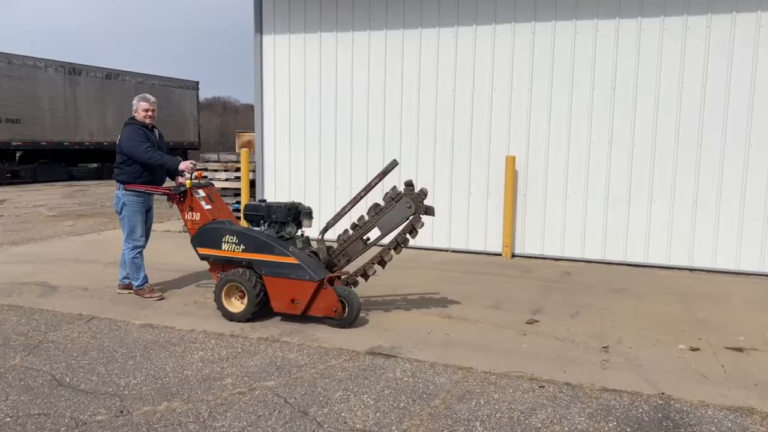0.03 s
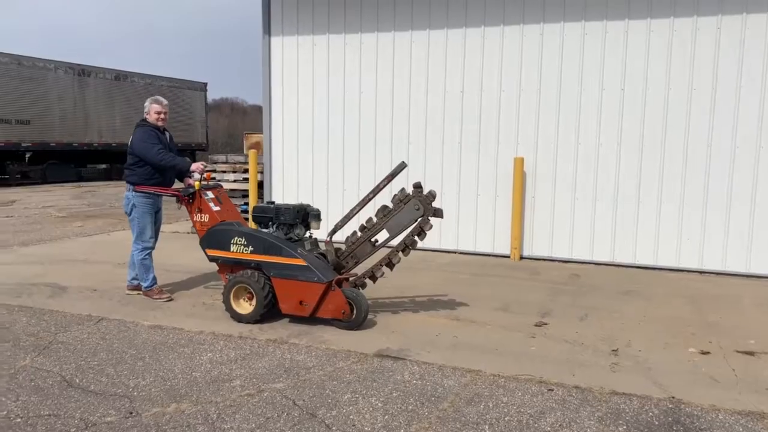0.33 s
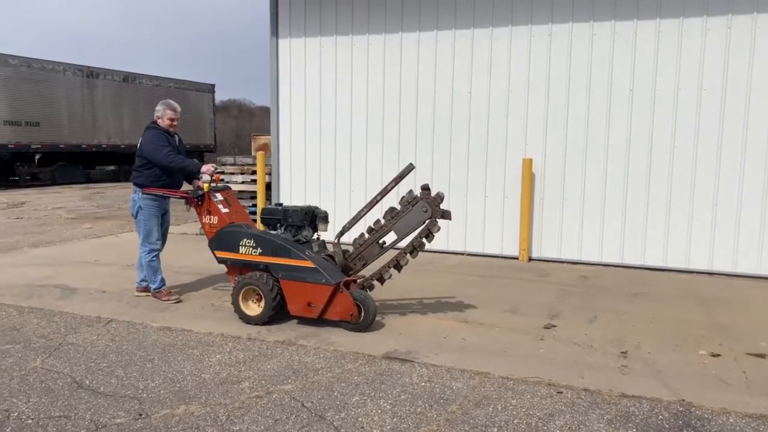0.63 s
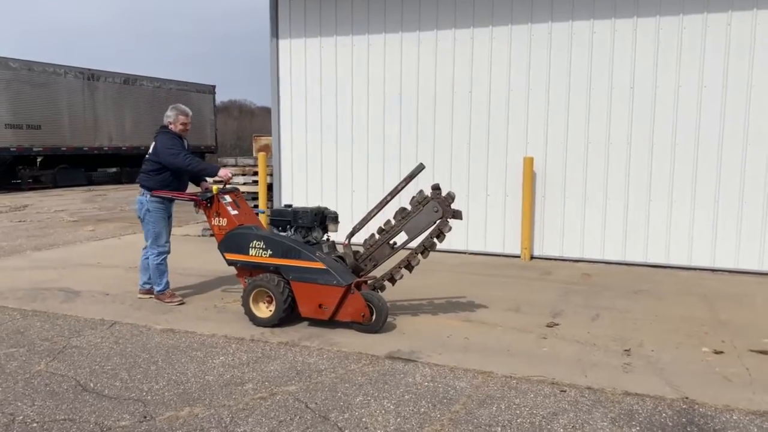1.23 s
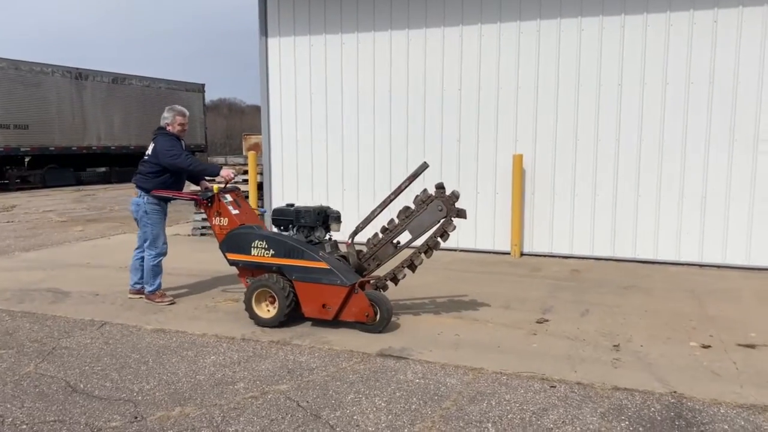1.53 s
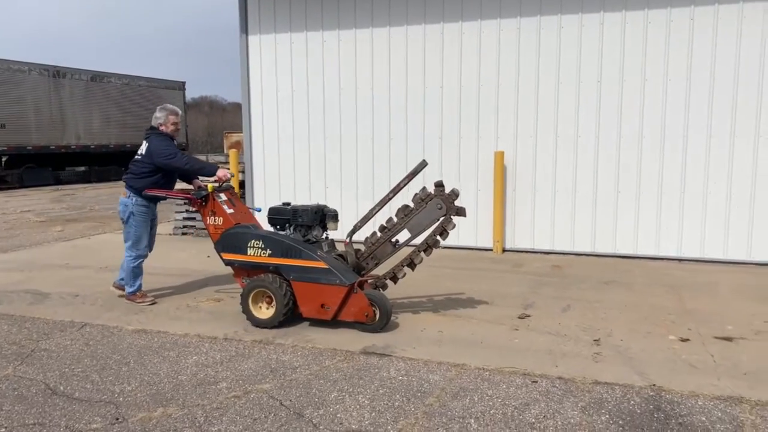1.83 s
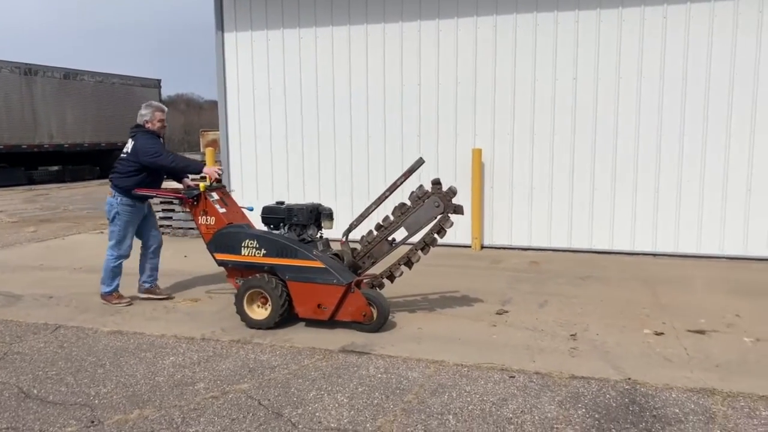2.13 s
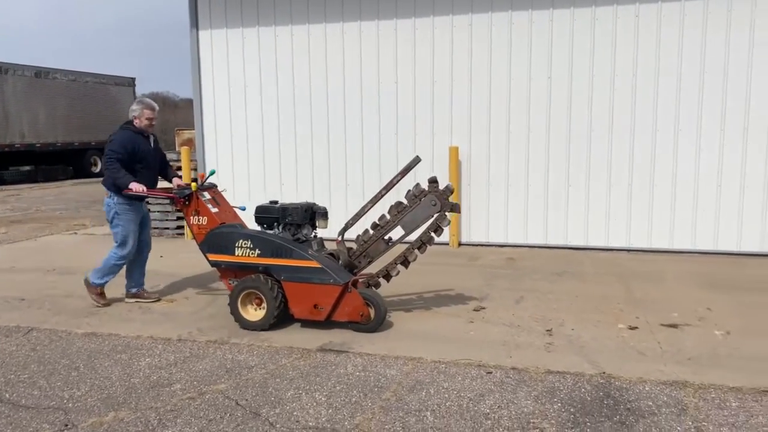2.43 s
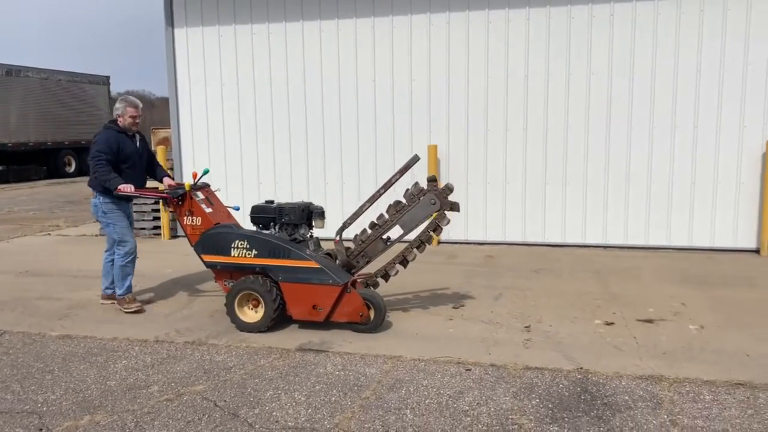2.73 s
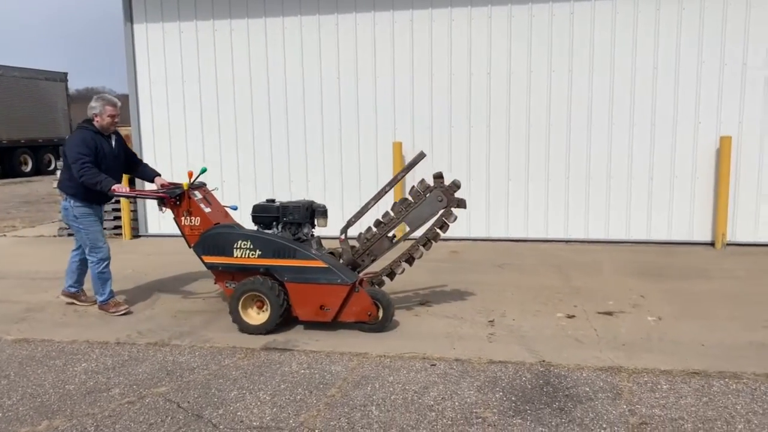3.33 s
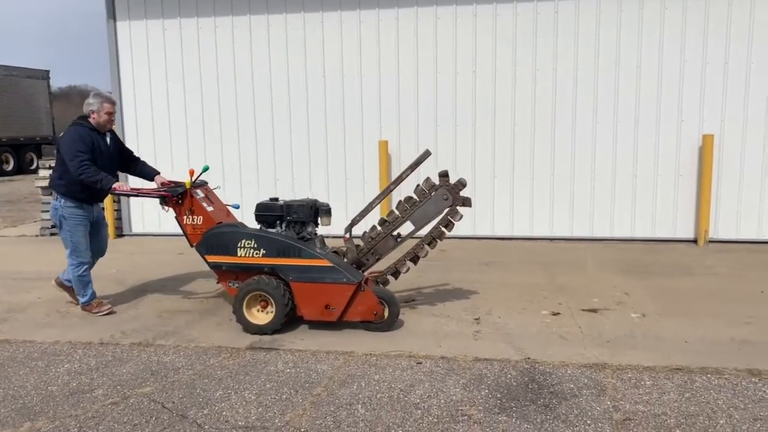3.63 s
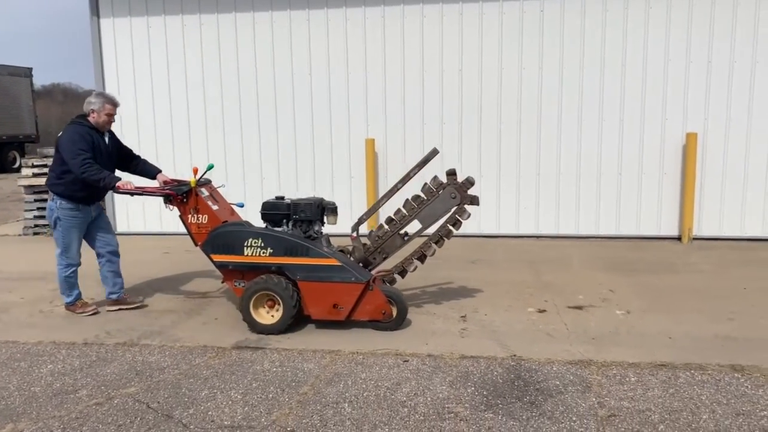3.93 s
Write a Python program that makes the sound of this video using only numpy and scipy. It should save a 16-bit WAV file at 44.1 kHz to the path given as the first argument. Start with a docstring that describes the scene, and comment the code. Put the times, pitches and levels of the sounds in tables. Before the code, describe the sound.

The small engine of a trenching machine drones outdoors, pulsing fast while its metal covers rattle. Fingers bump the microphone early on and again midway, with faint wind, then sharper clacks briefly join the steady running.

```python
"""A walk-behind trencher rolls slowly across a concrete yard, in front of a steel wall. From the start,
each cycle of its single-cylinder four-stroke brings a low throb, a burst of hiss and a valve tick, and
rings the muffler and covers over a bed of clatter. Near 0.4 s come a puff of breeze and four close
knocks that dive in pitch, like fingers on the microphone case. The wide, phasey stereo image shifts,
two more knocks land just after 2 s, harder firings clack until 3.4 s, and a faint knock comes last."""
import sys
import numpy as np
from scipy import signal
from scipy.fft import rfft, irfft
from scipy.io import wavfile

SR = 44100
rng = np.random.default_rng(int(sys.argv[2]) if len(sys.argv) > 2 else 0)


def log_audio(samples):
    """Write samples as a 16-bit WAV file to the path given in sys.argv[1]."""
    # one column per channel
    frames = np.atleast_2d(samples).T
    # limit to full scale, then quantise
    limited = np.clip(frames, -1, 1)
    pcm = np.round(limited * 32767).astype(np.int16)
    wavfile.write(sys.argv[1], SR, pcm)


N = 176400
TIME = np.arange(N) / SR
OPEN_S = .036   # silence until here


def from_db(db):
    """Decibels to gain."""
    return 10 ** (np.asarray(db) / 20)

def in_time(rows):
    """An automation curve, read at every sample."""
    return np.interp(TIME, *np.transpose(rows))

def at_hz(points, hz):
    """A curve read on a log-frequency axis."""
    f, value = np.transpose(points)
    return np.interp(np.log(hz + 1), np.log(f + 1), value)

def colour(x, spectrum):
    """Give white noise of spread 1 a spectrum in dB per Hz."""
    hz = np.arange(N // 2 + 1) * SR / N
    return irfft(rfft(x) * from_db(at_hz(spectrum, hz)), N) * np.sqrt(SR / 2)

def resonate(x, hz, width):
    """One resonance, its skirts steepened by a second, wider one; rms 1."""
    for w in (width, 6 * width):
        r = np.exp(-np.pi * w / SR)
        x = signal.lfilter([1, 0, -1], [1, -2 * r * np.cos(2 * np.pi * hz / SR), r * r], x)
    return x / x.std()

def shaking(cycles, repeat, size=1760):
    """White vibration; the share `repeat` of its power loops with the engine cycle."""
    loop = irfft(np.exp(2j * np.pi * rng.random(size // 2 + 1)), size) * np.sqrt(size)
    looped = loop[(cycles % 1 * size).astype(int)]
    return np.sqrt(repeat) * looped + np.sqrt(1 - repeat) * rng.standard_normal(N)


# The engine's pace. Each row: time in seconds, crank speed in rpm.
SPEED = [(0.0, 3044), (0.6, 3065), (1.0, 3031), (1.4, 3037), (1.8, 2974), (2.2, 2984), (2.7, 3013),
         (3.3, 2999), (4.0, 2974)]

def engine_cycles(wobble_cycles=.004, wobble_hz=14):
    """Running count of cycles: one firing per two crank turns, slightly unsteady."""
    r = np.exp(-2 * np.pi * wobble_hz / SR)
    drift = signal.lfilter([1], [1, -2 * r, r * r], rng.standard_normal(N))
    cycles = .05 + np.cumsum(in_time(SPEED)) / (120 * SR)
    return cycles + wobble_cycles * drift / drift.std()


# Harder firings that clack. Each row: time in seconds, accent in dB.
CLACKS = [(2.333, 5), (2.653, 4.5), (2.773, 5), (2.812, 5.5), (2.932, 4), (3.012, 4), (3.093, 4),
          (3.133, 4), (3.293, 3), (3.373, 5)]
FIRING_AT = .792   # share of the cycle

def force(cycles, scatter_db, count=128):
    """Strength of each cycle: a little random, accented at the clacks."""
    db = scatter_db * rng.standard_normal(count)
    cycle = np.floor(cycles - FIRING_AT + 1.25).astype(int) % count   # steps a quarter cycle early
    for s, accent_db in CLACKS:
        db[cycle[int(s * SR)]] = accent_db
    return from_db(db)[cycle]

def strikes(cycles, at, count=104, jitter_s=.0001):
    """One click per cycle, slightly uneven in time and strength."""
    s = np.interp(np.arange(count) + at, cycles, TIME) + jitter_s * rng.standard_normal(count)
    s = s[(s > OPEN_S) & (s < TIME[-1] - .01)]
    clicks = np.zeros(N)
    clicks[(s * SR).astype(int)] = 1
    return clicks * force(cycles, scatter_db=2.7) + 1e-18


# The covers' notes. Each row: pitch in Hz, width in Hz, level in dB when facing the listener, strike
# point as a share of the cycle, struck share of the power, facing time in seconds, fade either side
# of that time in dB per second (negative grows).
COVERS = [(642, 43, -37, 0.55, 0.16, 3.4, 6), (630, 35, -30, 0.144, 0.39, 2, 34),
          (820, 75, -37.5, 0.85, 0.11, 0.11, 33), (775, 48.5, -37, 0.1008, 0.42, 3.8, -1),
          (857.7, 30, -33.5, 0.1004, 0.26, 4.1, 2), (920, 40, -46, 0.3, .2, 5.2, 9),
          (1132, 91, -41.5, .56, 0.38, 2.77, 1.5), (1229, 35, -41.5, 0.13, 0.63, 2.1, 9),
          (1330, 116, -40.5, .3, 0.13, 2.96, 7), (1567, 128, -39, .77, 0.5, 1.2, 4.5),
          (2380, 124, -38, 0.89, 0.1, 2.67, 7.5), (3150, 400, -38.5, 1, .15, 1.15, 11.5),
          (4467, 134, -40, .78, 0.85, 1.2, 3.5), (4546, 140, -37.5, .8, 0.87, 3.39, 30)]

def covers(cycles):
    """Each cover rings, struck at its own point of the cycle and shaken in between."""
    out = 0
    for hz, width, db, at, share, facing_s, fade in COVERS:
        struck = resonate(strikes(cycles, at), hz, width)
        shaken = resonate(shaking(cycles, repeat=.46), hz, width)
        ring = np.sqrt(share) * struck + np.sqrt(1 - share) * shaken
        out += from_db(db - fade * abs(TIME - facing_s)) * ring
    return out


# Faders for the muffler's two notes. Each row: time in seconds, level in dB.
HOLLOW_LEVEL = [(.1, -36), (.6, -61), (.85, -37), (1.1, -33), (1.45, -29.5), (1.8, -37.5), (2.3, -57),
                (4, -42)]
POP_LEVEL = [(.1, -50), (.8, -49), (1.2, -44), (2, -43), (2.4, -39), (2.8, -38), (3.3, -37.5), (4, -44)]

def muffler(cycles):
    """Every firing rings the muffler: mostly a hollow note at first, a higher pop later."""
    hollow = resonate(strikes(cycles, at=.67), hz=815, width=42)
    pop = resonate(strikes(cycles, at=.79), hz=1365, width=95)
    return from_db(in_time(HOLLOW_LEVEL)) * hollow + from_db(in_time(POP_LEVEL)) * pop


# The clatter's tone. Each row: frequency in Hz, level in dB per Hz before the fader.
CLATTER = [(500, -81), (700, -67.5), (900, -77), (1030, -74.5), (1400, -72), (1900, -65.5), (2700, -69),
           (3600, -66), (4200, -73), (5500, -80), (7000, -80), (11000, -78), (13000, -85.5), (16000, -115)]
# Its fader. Each row: time in seconds, gain in dB.
CLATTER_LEVEL = [(.1, -.5), (.8, -0.5), (1.3, -2.5), (1.8, -8), (2.3, 0), (2.8, 0), (3.3, -4), (4, -11.5)]

def clatter(cycles):
    """Gears and tappets make a dense noise that swells a little after each firing."""
    swell_db = 1.24 * np.cos(2 * np.pi * cycles)
    return from_db(in_time(CLATTER_LEVEL) + swell_db) * colour(shaking(cycles, repeat=.072), CLATTER)


# The hiss's tone. Each row: frequency in Hz, level in dB per Hz before envelope and fader.
HISS = [(1200, -74), (2000, -63), (2900, -76.5), (4000, -69), (4800, -69), (5700, -75.5), (7200, -66),
        (9000, -71), (11000, -66.5), (12200, -70), (13500, -73.5), (15500, -71), (16200, -126)]
# Its fader. Each row: time in seconds, gain in dB.
HISS_LEVEL = [(.1, -9), (.8, -3), (1.3, -4.5), (1.8, -1.5), (2.3, -0.5), (2.8, -1.5), (3.3, -1), (3.7, -4),
              (4, -0.5)]

def hiss(cycles, rise=.093, hold=.023, decay=.18):
    """A sharp burst at each firing; envelope times are shares of a cycle."""
    age = (cycles - FIRING_AT) % 1
    envelope = np.minimum(age / rise, 1) * np.exp(-np.maximum(age - rise - hold, 0) / decay)
    burst = envelope * force(cycles, scatter_db=1.7) * colour(rng.standard_normal(N), HISS)
    return from_db(in_time(HISS_LEVEL)) * burst


# The throb's partials. Each row: multiple of the crank rate, level in dB before the fader.
ORDERS = [(1, -51), (1.5, -62), (2, -52.5), (2.5, -74), (3, -52), (3.5, -59.5), (4, -62), (4.5, -58.5)]
# The rumble's tone. Each row: frequency in Hz, level in dB per Hz before the fader.
RUMBLE = [(40, -87), (100, -90), (160, -71), (220, -71), (310, -61.5), (440, -69.5), (600, -63), (900, -86)]
# Their faders. Each row: time in seconds, gain in dB.
THROB_LEVEL = [(.1, 4.5), (.7, 1), (1.3, -1), (1.8, -2), (2.3, 6.5), (2.8, 4), (3.3, 2.5), (4, -1.5)]
RUMBLE_LEVEL = [(.1, -2.5), (.6, -8), (1.0, -14), (1.4, -12.5), (1.9, -1.5), (2.6, -7.5), (3.3, -8.5),
                (4, -7.5)]

def throb(cycles):
    """The low end: tones locked to the crank, plus exhaust rumble."""
    tones = 0
    for order, db in ORDERS:
        tones += from_db(db) * np.sqrt(2) * np.sin(2 * np.pi * (2 * order * cycles + rng.random()))
    rumble = colour(shaking(cycles, repeat=.73), RUMBLE)
    return from_db(in_time(THROB_LEVEL)) * tones + from_db(in_time(RUMBLE_LEVEL)) * rumble


# The tick's tone. Each row: frequency in Hz, peak level in dB per Hz.
TICK = [(3000, -75.5), (7000, -79), (11000, -71), (16000, -89)]

def valve_tick(cycles, at=.442, width=.031):
    """A valve ticks between firings: a small, rounded pulse of bright noise."""
    offset = (cycles - at + .5) % 1 - .5
    return np.exp(-.5 * (offset / width) ** 2) * colour(rng.standard_normal(N), TICK)


# Metallic glints. Each row: start in seconds, level in dB before the high-pass.
PINGS = [(2.811, -23), (3.012, -18), (3.373, -22)]

def pings(decay_s=.0022, low_hz=9000):
    """Loose metal ticks brightly on three of the hard firings."""
    envelope = sum(from_db(db) * (TIME > s) * np.exp(-abs(TIME - s) / decay_s) for s, db in PINGS)
    highpass = signal.butter(2, low_hz, "high", fs=SR, output="sos")
    return signal.sosfilt(highpass, envelope * rng.standard_normal(N) + 1e-18)


# Close knocks. Each row: start in seconds, level in dB at ref_hz before the band limits, top and bottom
# of the band in Hz, fade in dB per falling octave, left delay in seconds, sweep in Hz times seconds.
KNOCKS = [(.3797, -15, 1300, 400, 4, 0.00055, 1.64), (0.4164, -11, 1680, 402, 5.5, 0.00021, 2),
          (.4328, -11.5, 875, 390, 10.5, 0.00017, 2.04), (.4355, -13, 785, 348, 9.5, 0.00011, 1.76),
          (2.178, -5.5, 950, 63.5, 6, 0.00089, 1.27), (2.3930, -13.5, 740, 69.5, 3, 0.00076, 1.73),
          (3.766, -34, 160, 74.5, 3.5, 0.00076, 1.4)]

def knocks(ref_hz=748, left_db=-6.5):
    """Each knock is a fast downward sweep, earlier and louder on the right."""
    out = 0
    for s, db, top_hz, low_hz, fade_db, lag_s, sweep in KNOCKS:
        age = np.maximum(TIME - s - np.array([[lag_s], [0]]), 1 / SR)
        hz = sweep / age
        band = 1 / np.sqrt((1 + (hz / top_hz) ** 10) * (1 + (low_hz / hz) ** 10))
        level = from_db(db + fade_db * np.log2(hz / ref_hz))
        out += band * level * np.sin(2 * np.pi * sweep * np.log(hz / ref_hz))
    return out * from_db([[left_db], [0]])


# The rub under a 0 dB knock. Each row: frequency in Hz, level in dB per Hz.
GRIT = [(150, -88), (400, -51), (700, -48), (1400, -44), (2800, -76), (8000, -100)]

def grit(delay_s=.00206, decay_s=.012):
    """Each knock rubs a little, which roughens it."""
    envelope = 0
    for s, db, *_ in KNOCKS:
        age = TIME - s - delay_s
        envelope += from_db(db) * (age > 0) * np.exp(-abs(age) / decay_s)
    return envelope * np.array([colour(row, GRIT) for row in rng.standard_normal((2, N))])


# The body of the knocked case. Each row: pitch in Hz, width in Hz, gain in dB.
CASE = [(87, 62, 4.5), (488, 125, -5.5), (610, 84, 3)]

def case(knock):
    """A knock plus the short ring it leaves in the case."""
    out = knock
    for hz, width, db in CASE:
        r = np.exp(-np.pi * width / SR)
        ring = signal.lfilter([1, 0, -1], [1, -2 * r * np.cos(2 * np.pi * hz / SR), r * r], knock + 1e-18)
        out = out + from_db(db) * (1 - r * r) / 2 * ring
    return out


# The wide, phasey stereo image, early and late. Each row: frequency in Hz, left phase lead in radians.
PHASE_EARLY = [(60, -1), (130, -1.2), (300, -2), (560, -3), (700, -3.4), (820, -4.2), (1250, -5.7),
               (1650, -4), (1850, -6), (2400, -4), (3500, -3.4), (4400, -2.3), (5000, -1.8), (5400, -2.8),
               (6600, -.4), (7600, -2.4), (8600, -3.4), (10300, -6.2), (11600, -6.4), (13000, -9.2),
               (14200, -9.6), (15300, -12.5)]
PHASE_LATE = [(60, -1.3), (130, -1.9), (280, -2.7), (450, -1.3), (650, -2.7), (800, -3.15), (900, -3.6),
              (1370, -5.5), (2000, -4.1), (2850, -3.1), (4300, -1.9), (5200, .4), (5900, 3), (6600, 6.4),
              (7400, 9.2), (8300, 10.2), (8900, 14), (10200, 12.6), (11600, 12.4), (12900, 9.6),
              (14100, 9.3), (15300, 6.4)]
# The pan. Each row: frequency in Hz, left minus right in dB.
BALANCE = [(50, 1), (130, -4), (300, -6.5), (640, -3.5), (1400, 0.9), (3100, 2), (7000, -1.7), (15000, 0)]

def stereo_image(x, blend_s=(.88, 2.25)):
    """Stereo processing pans and phase-shifts each band, blending from the early to the late curve."""
    framing = dict(fs=SR, nperseg=1024, noverlap=768)
    hz, s, frames = signal.stft(x, **framing)
    blend = np.interp(s, blend_s, [0, 1])
    early = np.outer(np.exp(1j * at_hz(PHASE_EARLY, hz)), 1 - blend)
    late = np.outer(np.exp(1j * at_hz(PHASE_LATE, hz)), blend)
    pan = from_db(at_hz(BALANCE, hz) / 2)[:, None]
    pair = np.array([frames * pan * np.exp(1j * np.angle(early + late)), frames / pan])
    return signal.istft(pair, **framing)[1][:, :N]


# The reverb's tone. Each row: frequency in Hz, level in dB against the direct sound.
YARD = [(150, -13), (700, -11), (1200, 0.5), (2200, -6.5), (12000, -5)]

def yard(x, t60_s=.087, size=8192):
    """Short scattered reflections from wall and ground, different on each side."""
    tail = rng.standard_normal((2, size)) * from_db(-60 * TIME[:size] / t60_s)
    tail /= np.sqrt((tail ** 2).sum(axis=1, keepdims=True))
    send = colour(x, YARD) / np.sqrt(SR / 2)
    return signal.fftconvolve(send[None], tail, axes=1)[:, :N]


# The breeze's tone. Each row: frequency in Hz, level in dB per Hz before the gusts.
BREEZE = [(20, -98), (35, -85), (55, -74.5), (90, -81.5), (140, -83.5), (250, -89), (600, -110)]
# Its gusts. Each row: time in seconds, gain in dB.
GUSTS = [(0, -21), (.3, -29), (.42, 18), (.6, 5), (1.1, -11), (1.5, 9.5), (1.8, 3), (2.25, -1), (2.6, 7),
         (3.65, 4.5), (3.78, -7), (3.88, -3)]

def breeze():
    """Light air buffets the two microphones, partly each on its own."""
    shared, left, right = (colour(row, BREEZE) for row in rng.standard_normal((3, N)))
    return from_db(in_time(GUSTS)) * (shared + np.array([left, right])) / np.sqrt(2)


def scene():
    """The engine plays into the yard; breeze and knocks stay close and dry."""
    cycles = engine_cycles()
    engine = throb(cycles) + muffler(cycles) + covers(cycles) + clatter(cycles)
    engine += hiss(cycles) + valve_tick(cycles) + pings()
    return stereo_image(engine) + yard(engine) + breeze() + case(knocks() + grit())

def record(dry, cutoff_hz=16200):
    """The sound cuts in just after the start; a steep low-pass trims the top."""
    lowpass = signal.ellip(12, .1, 80, cutoff_hz, fs=SR, output="sos")
    return signal.sosfilt(lowpass, dry * (TIME > OPEN_S))


dry = scene()
out = record(dry)
log_audio(out)
```